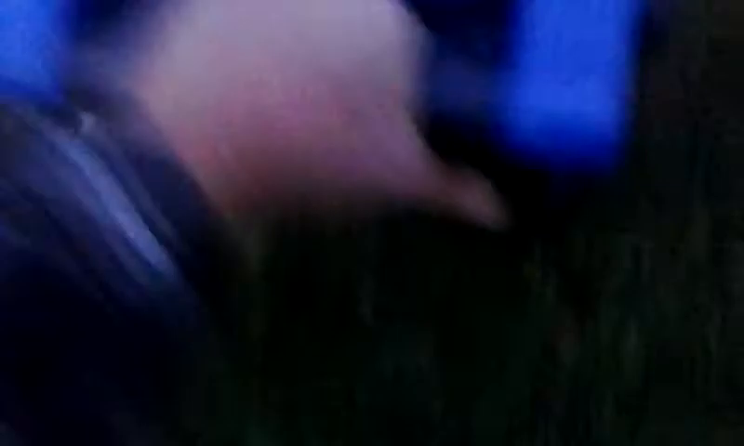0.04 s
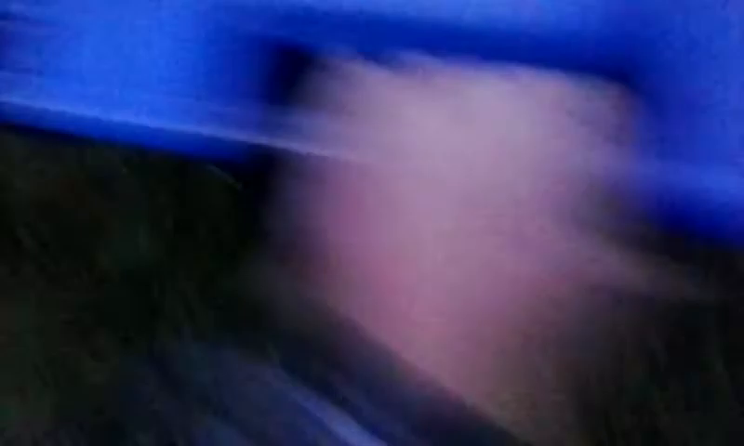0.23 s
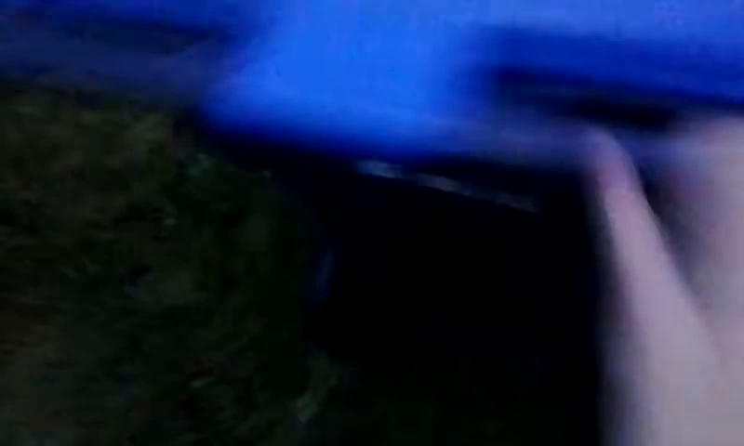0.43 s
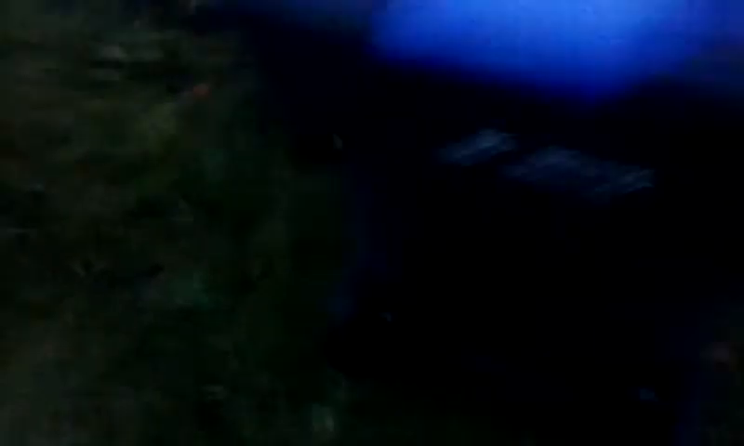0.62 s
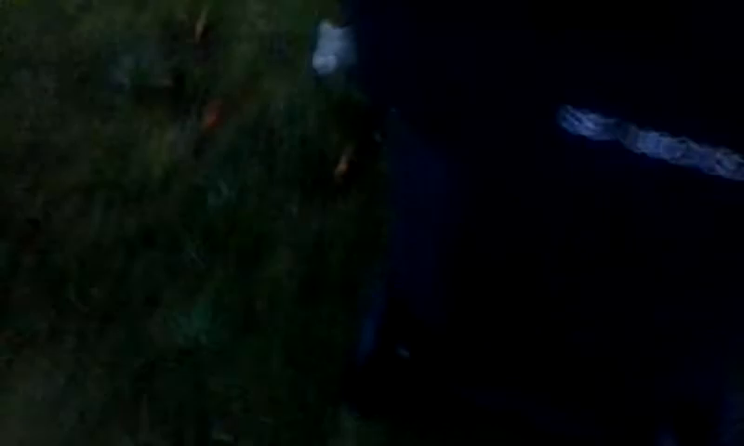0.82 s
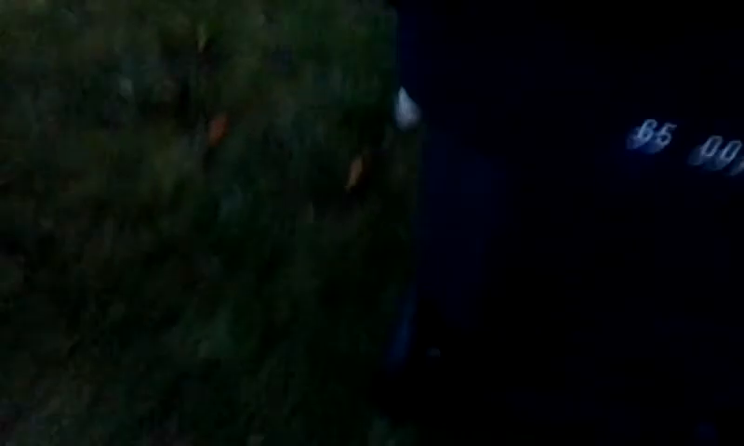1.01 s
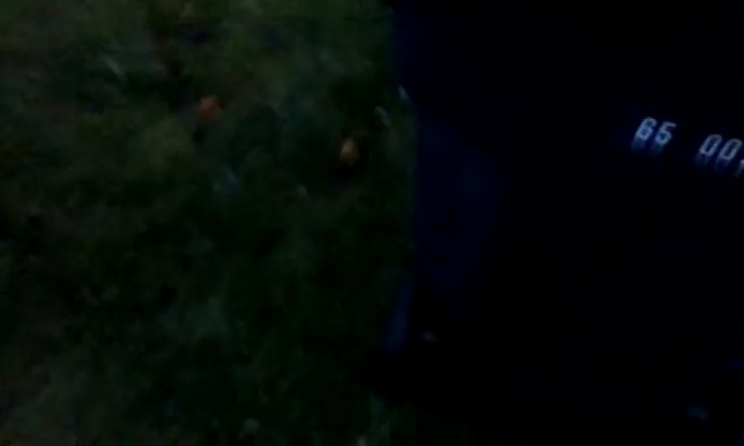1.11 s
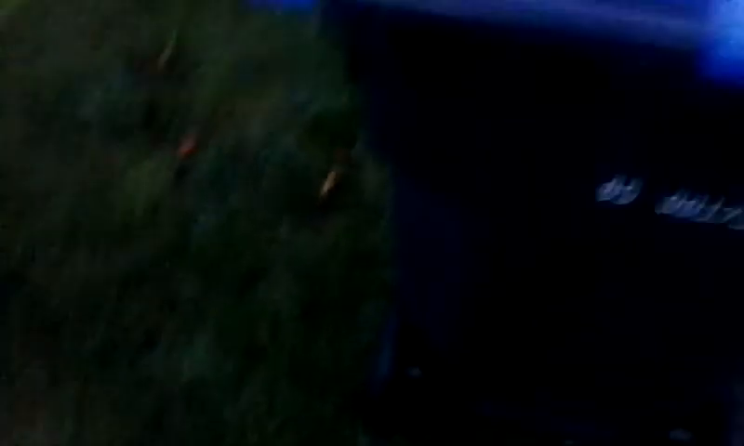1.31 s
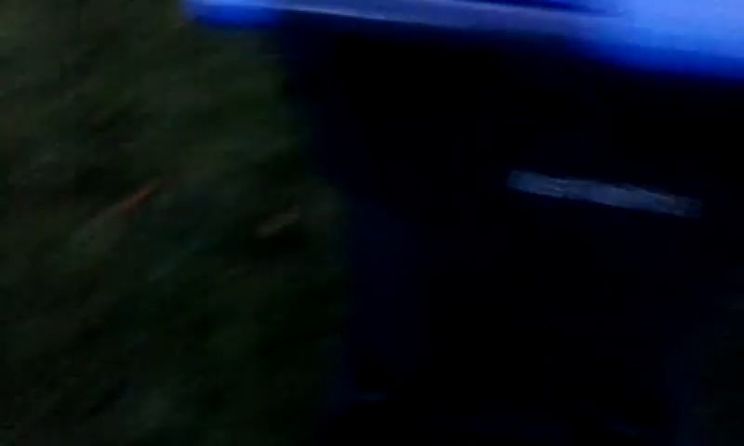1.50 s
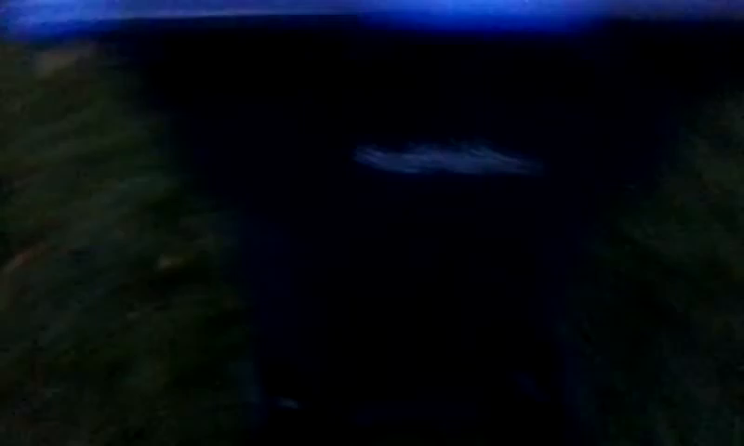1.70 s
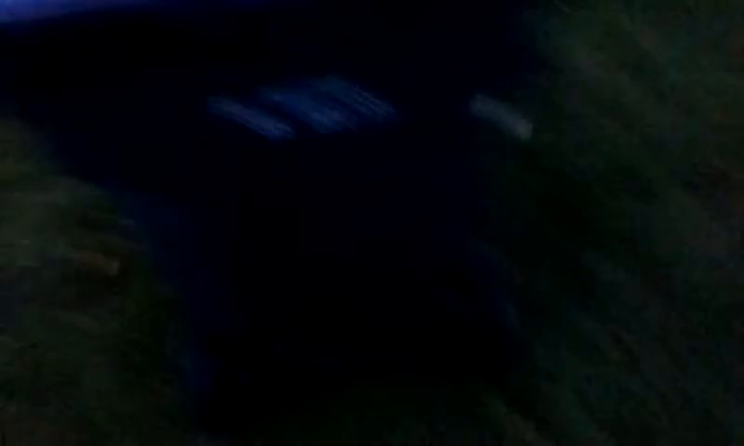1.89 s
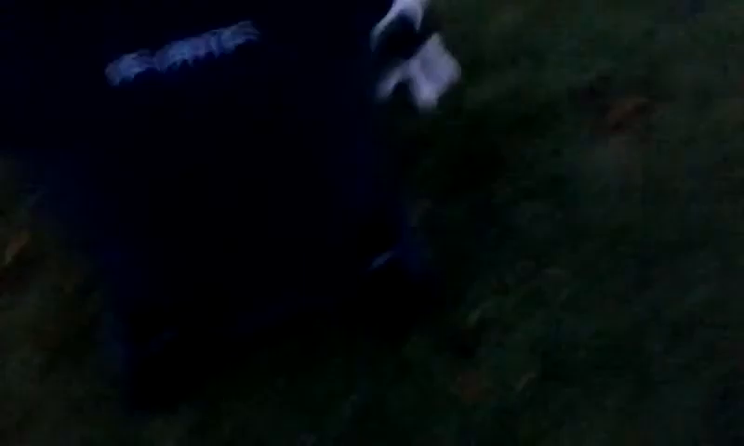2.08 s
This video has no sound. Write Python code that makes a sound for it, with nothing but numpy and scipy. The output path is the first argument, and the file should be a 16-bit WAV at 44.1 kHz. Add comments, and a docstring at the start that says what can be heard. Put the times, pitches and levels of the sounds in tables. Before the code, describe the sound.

Hollow knocks and one loud lid slam from a plastic wheelie bin handled outdoors.

```python
"""Wheelie bin on a lawn

A plastic bin is grabbed, bumped and tipped, close to the microphone. Each bump rings the walls,
booms in the hollow and sets the loose parts clattering; plastic cracks against plastic, and one
hard clap of the lid overloads the recorder. Low wind, a rustle of grass, thin squeaks and a faint
hiss lie underneath."""
import sys
import numpy as np
from scipy import signal
from scipy.fft import rfft, irfft
from scipy.io import wavfile

SR = 44100
rng = np.random.default_rng(int(sys.argv[2]) if len(sys.argv) > 2 else 0)


def output_pcm(signal):
    """Save a mono or channel-first signal as 16-bit PCM at the path in sys.argv[1].

    Samples are clipped to [-1, 1] before scaling.
    """
    pcm = np.clip(np.atleast_2d(signal).T, -1, 1) * 32767
    wavfile.write(sys.argv[1], SR, np.round(pcm).astype(np.int16))


N = 94815
T = np.arange(SR // 2) / SR  # seconds after a hit


def amp(db):
    """Decibels to gain."""
    return 10 ** (np.asarray(db) / 20)


def unit(x):
    """Scales to rms 1."""
    return x / np.sqrt(np.mean(x ** 2) + 1e-20)


def read(points, hz):
    """Reads a curve on a log-frequency axis."""
    f, value = np.transpose(points)
    return np.interp(np.log(hz + 1), np.log(f), value)


def add(mix, start_s, sound):
    """Drops a sound into the mix."""
    part = mix[max(round(start_s * SR), 0):][:len(sound)]
    part += sound[:len(part)]


def noise(spectrum, size):
    """Noise of rms 1, coloured by a curve of freq_hz, level_db."""
    gain = amp(read(spectrum, np.fft.rfftfreq(size, 1 / SR)))
    return unit(irfft(rfft(rng.standard_normal(size)) * gain, size))


def wander(rate_hz, size):
    """Smooth random motion of rms 1, rolling off above the given rate."""
    rolloff = np.exp(-(np.fft.rfftfreq(size, 1 / SR) / rate_hz) ** 2)
    return unit(irfft(rfft(rng.standard_normal(size)) * rolloff, size))


def envelope(rise_s, t60_s, t=T):
    """Builds up from silence while dying away by 60 dB in t60_s."""
    return (1 - np.exp(-t / rise_s)) * np.exp(-np.log(1000) * t / t60_s)


def ring(modes, rise_s, stretch=1):
    """Dying sines that build over the time of contact; a firm grip (stretch below 1) shortens them."""
    return sum(amp(db) * envelope(rise_s, t60_s * stretch) * np.sin(2 * np.pi * hz * T)
               for hz, db, t60_s in modes)


def wind():
    """Low rumble and distant air that swell gently."""
    # colour of the wind: freq_hz, relative_db
    spectrum = [(15, -21), (30, -11), (46, 5), (60, -2.5), (74, 1), (100, -1), (170, -6), (240, -10),
                (290, -12), (400, -19.5), (750, -19.5), (1100, -28.5), (1800, -36), (3000, -47.5),
                (6000, -73.5), (16000, -77)]
    level_db, gust_db = -36.5, 0.7
    return noise(spectrum, N) * amp(level_db + gust_db * wander(rate_hz=3, size=N))


def rustle():
    """Grainy friction of grass and sleeve as the bin is pulled about."""
    # colour of the friction: freq_hz, relative_db
    spectrum = [(300, 5), (1100, 1), (1800, 8.5), (2500, -3), (3100, -6), (3550, 1), (4100, -11),
                (5500, -11.5), (7200, -5), (8200, -15), (10500, -9.5), (16000, -22)]
    # swells of the rustle: time_s, level_db
    swells = [(0, -55.5), (.2, -54.5), (.36, -75), (0.428, -43), (.53, -65.5), (.66, -48), (.85, -51.5),
              (.98, -46.5), (1.092, -48.5), (1.2, -87), (2.15, -57.5)]
    level_db = np.interp(np.arange(N) / SR, *np.transpose(swells))
    grain_db = 1.5
    return noise(spectrum, N) * amp(level_db + grain_db * wander(rate_hz=147, size=N))


def squeaks():
    """Brief narrow whistles, high and faint."""
    # thin squeaks: start_s, length_s, level_db
    cues = [(.01, 0.073, -56), (.262, 0.03, -44), (0.872, 0.019, -50.5), (.925, 0.071, -55.5),
            (1.509, 0.051, -58)]
    pitch_hz, width_hz = 8630, 84
    out = np.zeros(N)
    for start_s, length_s, level_db in cues:
        arch = np.sin(np.pi * np.sqrt(np.minimum(T / length_s, 1)))
        whistle = unit(wander(width_hz, len(T)) * np.sin(2 * np.pi * pitch_hz * T))
        add(out, start_s, amp(level_db) * arch * whistle)
    return out


def yard(knocks):
    """The surroundings scatter the knocks back as a weak tail."""
    send_db = -23
    tail = rng.standard_normal(len(T)) * envelope(rise_s=0.06, t60_s=0.5)
    return amp(send_db) * signal.fftconvolve(knocks, tail / np.linalg.norm(tail))[:N]


def cracks():
    """Short dry bursts where plastic meets plastic."""
    # snaps at contact: start_s, level_db, centre_hz, half_width_octaves
    snaps = [(0.021, -46.5, 3500, 0.65), (0.2395, -35.5, 1510, 1), (0.2375, -44, 7900, .6),
             (0.4770, -23.5, 1480, 0.62), (0.474, -42.5, 8000, 0.66), (0.484, -22, 660, 0.23),
             (0.7868, -6.5, 572, 0.19), (0.7913, -20, 1390, 0.71), (0.7936, -37.5, 3930, 0.35),
             (0.8088, -18.5, 1414, 0.57), (1.1655, -17.5, 510, 0.66), (1.5745, -32, 990, 0.8)]
    out, hz = np.zeros(N), np.geomspace(30, 18000, num=60)
    burst = envelope(rise_s=0.001, t60_s=0.05, t=T[:SR // 4])
    for start_s, level_db, centre_hz, octaves in snaps:
        band_db = -20 * np.log10(1 + (np.log2(hz / centre_hz) / octaves) ** 4)
        add(out, start_s, amp(level_db) * noise(np.c_[hz, band_db], len(burst)) * burst)
    return out


def clatter(tilt_db, stretch):
    """Dense modes of shell and loose parts: noise bands dying at their own speeds, with chatter."""
    # colour of the clatter before the tilt: freq_hz, relative_db
    spectrum = [(40, -24.5), (130, -6), (300, 2), (550, -7.5), (850, -10), (1100, -18.5), (1500, -17),
                (2100, -22.5), (3000, -32), (5000, -79), (15000, -71)]
    # decay of each band before the stretch: freq_hz, t60_s
    decays = [(100, 0.23), (500, 0.19), (1800, 0.23), (3500, 0.042), (8000, 0.018)]
    size = len(T)
    hz = np.fft.rfftfreq(size, 1 / SR)
    octaves = np.log2(np.clip(hz, 100, 4000) / 400)  # the tilt pivots on 400 Hz
    tilted = rfft(noise(spectrum, size)) * amp(tilt_db * octaves)
    centres_hz, t60s = np.transpose(decays)
    out = np.zeros(size)
    for share, t60_s in zip(np.eye(len(decays)), t60s):
        band = read(np.c_[centres_hz, share], hz)  # crossfades into its neighbours
        out += irfft(tilted * band, size) * envelope(rise_s=0.00097, t60_s=t60_s * stretch)
    chatter_db = 0.5 * np.tanh(wander(rate_hz=147, size=size))  # uneven contact of the loose parts
    return out * amp(chatter_db)


def bin_body():
    """Every bump rings the walls, booms the hollow and shakes the loose parts by its own amounts."""
    # bumps and rebounds: start_s, wall_db, wall_stretch, boom_db,
    # clatter_db, clatter_tilt_db_per_octave, clatter_stretch
    bumps = [(0.2360, -7, 0.52, -54, -22.5, 0, 1.42), (0.2725, -13, 0.96, -21.5, -26, -7, 1.3),
             (0.2837, -20.5, 1.7, -29, -35, 3.5, 1.04), (0.3203, -21, 1.26, -26.5, -38, 1.5, 1.9),
             (0.3421, -26.5, 0.84, -45, -39, 4, 0.52), (0.4757, -15.5, 1.1, -16, -21, 2, 1.73),
             (0.4970, -17, 0.76, -15, -25.5, -11, 1.36), (0.5213, -21.5, 1.9, -15, -30, 0.5, 1.85),
             (0.5637, -22, 1.4, -46, -44.5, 5.5, 1.5), (0.6660, -30.5, 0.82, -59, -48, -5, 0.58),
             (0.7880, -5, 0.81, -24.5, -19.5, 0.5, 1.57), (0.7979, -2.5, 0.42, -38, -31, -7.5, 1.96),
             (0.8903, -37, 0.54, -26.5, -33, 2.5, 0.65), (1.1089, -26, 0.99, -33.5, -28.5, 1, 0.52),
             (1.1196, -18.5, 1.07, -30, -28.5, -.5, 0.51), (1.1702, -6, 0.62, -28, -20, 1, 0.71),
             (1.1861, -11, 0.73, -34, -34, -12.5, 1.23), (1.1934, -16.5, 1.6, -41, -28.5, 0.5, 1.63),
             (1.5761, -16, 1.04, -39, -29, -1.5, 0.85), (1.622, -25.5, 1.1, -31.5, -44, 1, 1.3),
             (1.7237, -28, 0.23, -42, -43.5, -1, .8), (1.8824, -17, 0.65, -30.5, -35.5, -1, 0.27),
             (1.9042, -24, 0.3, -24.5, -37, -3.5, 0.81)]
    # modes of the plastic walls: pitch_hz, level_db, t60_s before the stretch
    wall_modes = [(169.4, -21, 0.32), (187, -8.5, .33), (190, 1, 0.076), (221.3, -11.5, 0.25),
                  (253.4, -32.5, 0.63), (297, -19, 0.24), (349.2, -19, 0.27), (465, -15, 0.059),
                  (488.2, -25.5, 0.57)]
    # modes of the air inside: pitch_hz, level_db, t60_s
    hollow_modes = [(73.6, 2, 0.53), (84.75, -6.5, 0.46), (116.7, -28.5, 0.057)]
    out, boom = np.zeros(N), ring(hollow_modes, rise_s=0.008)
    for start_s, wall_db, wall_stretch, boom_db, clatter_db, tilt_db, clatter_stretch in bumps:
        walls = ring(wall_modes, rise_s=0.003, stretch=wall_stretch)
        rattle = clatter(tilt_db, clatter_stretch)
        add(out, start_s, amp(wall_db) * walls + amp(boom_db) * boom + amp(clatter_db) * rattle)
    return out


def lid():
    """The lid strikes the rim and bounces, ringing at each hit."""
    # hits on the rim: start_s, level_db
    hits = [(0.7867, -16.5), (0.7939, -13), (0.8086, -17.5), (0.8205, -25.5)]
    # modes of the lid: pitch_hz, level_db, t60_s
    modes = [(433.4, 0, .13), (539, -14, .16), (580.6, -15, 0.32), (639, 0.5, 0.15), (714.7, -2, 0.2),
             (792, -15, .13), (1260, -14.5, 0.13), (1274, -10, 0.086), (1345, -3.5, 0.057),
             (1894, -28, 0.17)]
    out, clap = np.zeros(N), ring(modes, rise_s=0.0013)
    for start_s, level_db in hits:
        add(out, start_s, amp(level_db) * clap)
    return out


def scene():
    """The bin and its tail over wind, rustle, squeaks and the even hiss of the microphone, in mono."""
    hiss_db = -60
    knocks = bin_body() + lid() + cracks()
    mix = knocks + yard(knocks) + wind() + rustle() + squeaks()
    return (mix + amp(hiss_db) * rng.standard_normal(N))[None]


def record(dry):
    """The microphone sheds the deepest bass, overload flattens the peaks, and the top treble is cut."""
    low_cut_hz, high_cut_hz = 28, 15900
    ceiling, knee = 0.57, 8
    thin = signal.sosfilt(signal.butter(2, low_cut_hz, "high", fs=SR, output="sos"), dry)
    clipped = thin / (1 + abs(thin / ceiling) ** knee) ** (1 / knee)
    lowpass = signal.firwin(511, high_cut_hz, window=("kaiser", 9), fs=SR)
    return signal.oaconvolve(clipped, lowpass[None], "same")


dry = scene()
out = record(dry)
output_pcm(out)
```